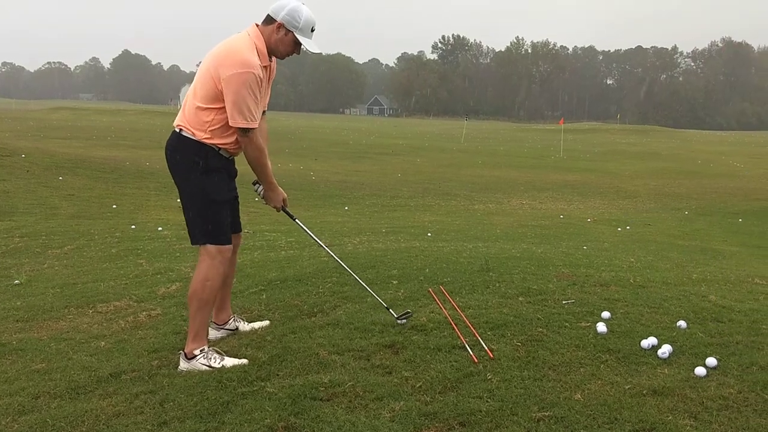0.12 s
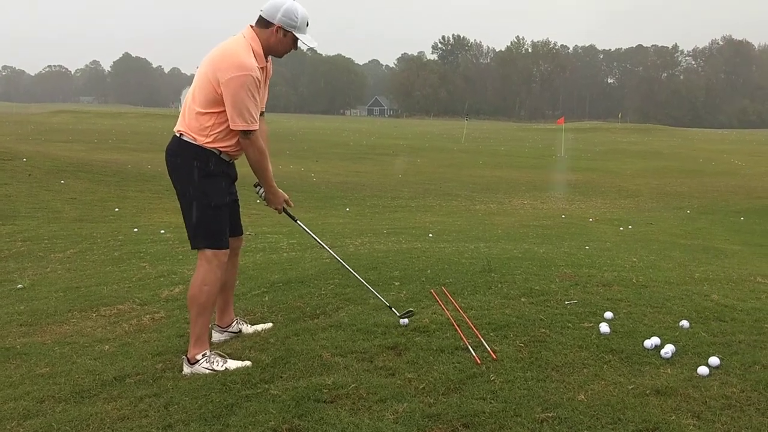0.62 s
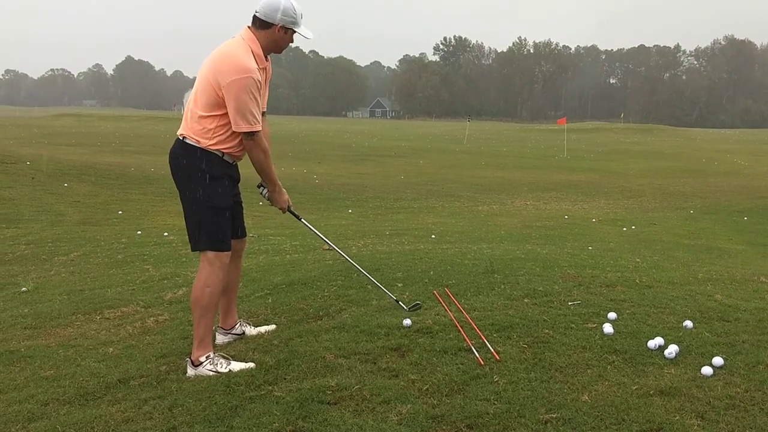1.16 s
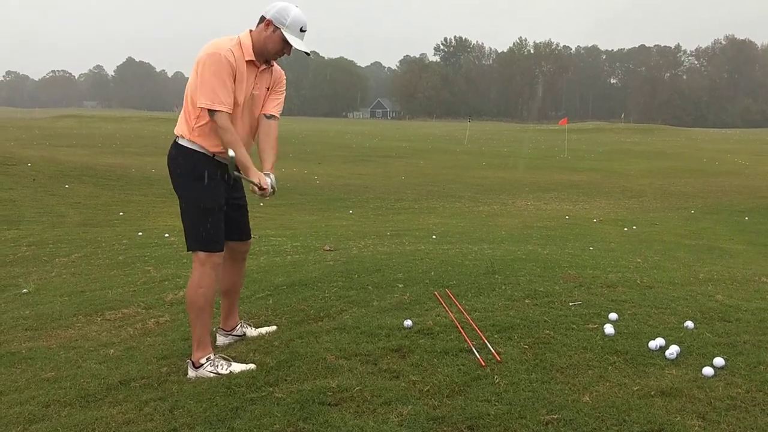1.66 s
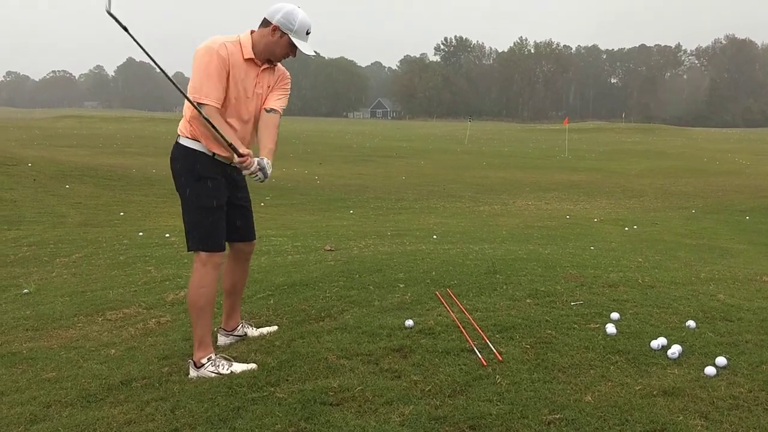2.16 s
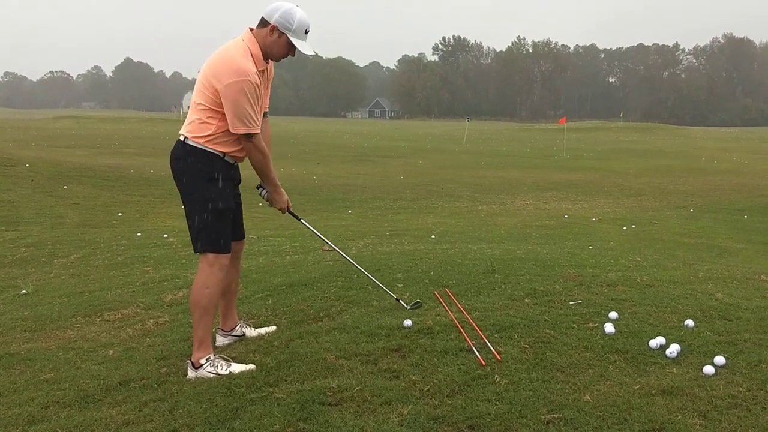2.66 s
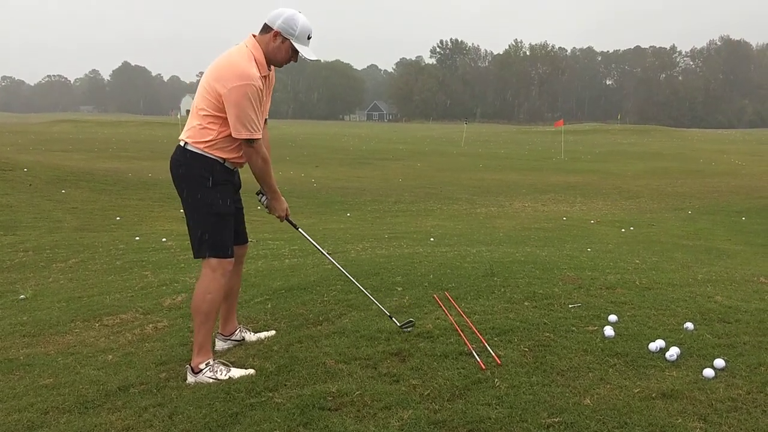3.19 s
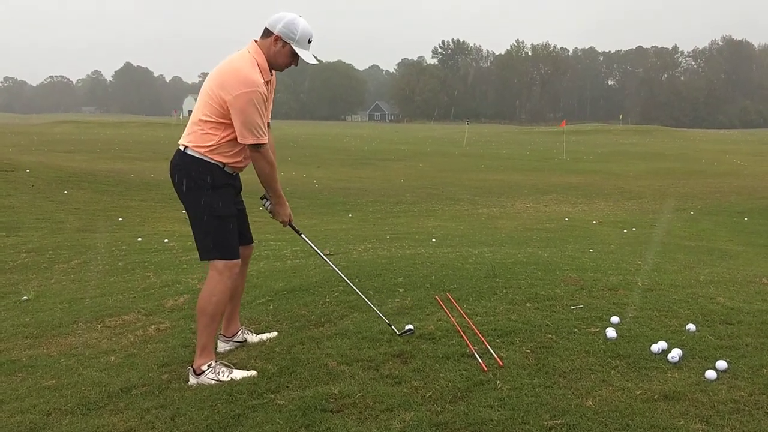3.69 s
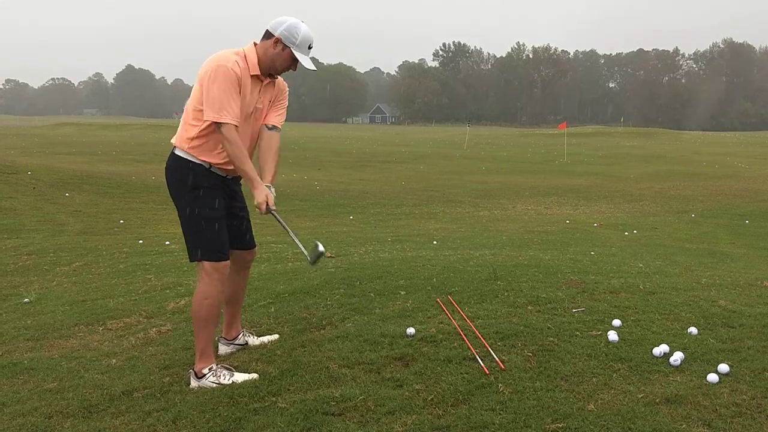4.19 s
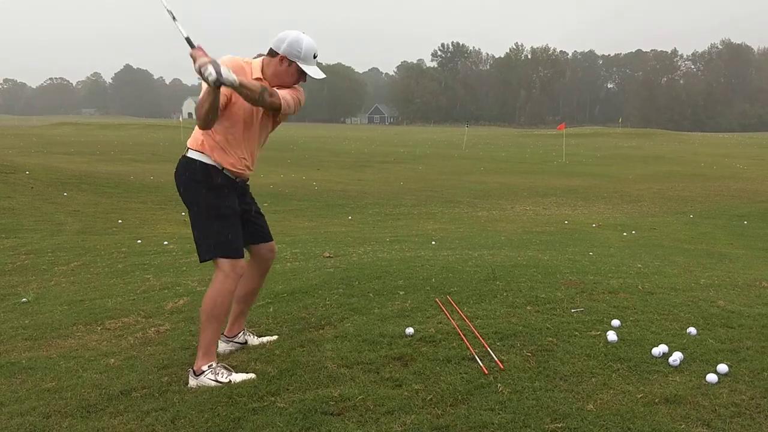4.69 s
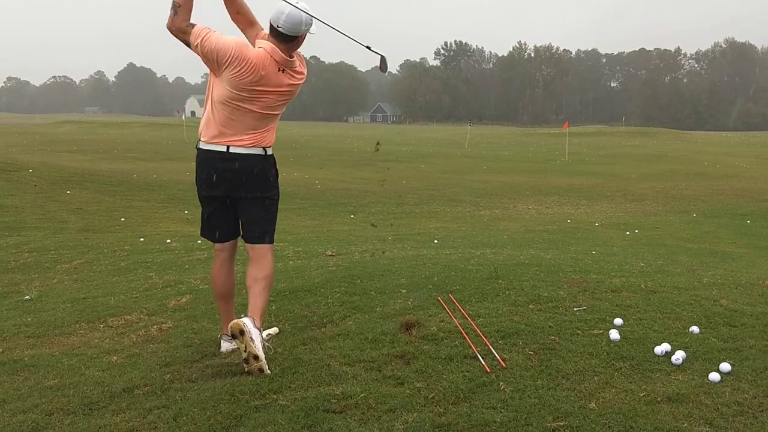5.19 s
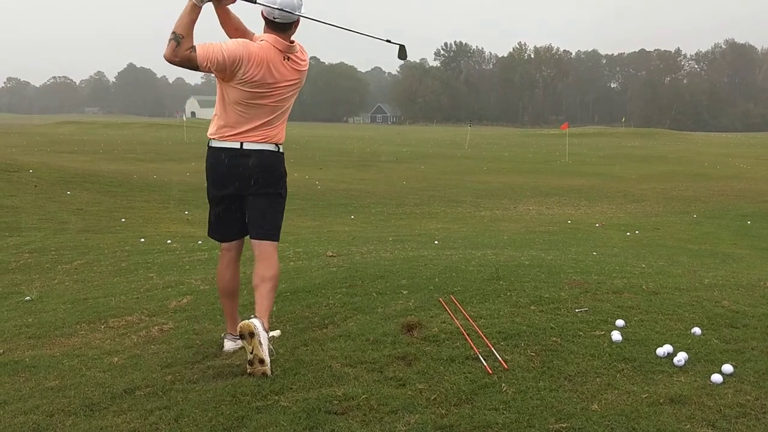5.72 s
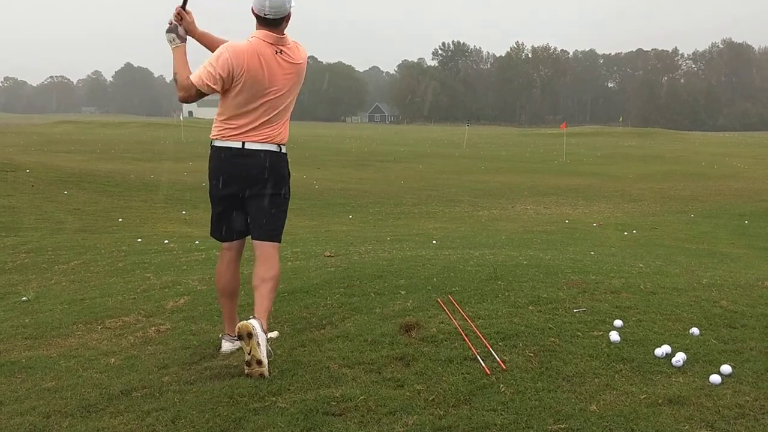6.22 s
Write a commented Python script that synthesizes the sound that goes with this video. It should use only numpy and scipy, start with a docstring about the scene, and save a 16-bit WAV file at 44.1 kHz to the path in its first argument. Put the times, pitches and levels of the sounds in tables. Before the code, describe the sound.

Steady rain hisses and ticks close to the microphone until a golf iron whooshes and cracks a ball; everything then drops suddenly quieter.

```python
"""Steady rain on open grass, on a handheld camera with two microphone ports: far rain hisses, drops tick on the casing
nearer one port or the other, water sputters in a port, wind buffets both ports and a far motor hums throughout.
Late on, a golf iron swings down with a rough whistle and a rush of air, then thuds and skids into the turf;
4 ms later its face cracks the ball and throws soil. The camera's gain control ducks deeply and creeps back."""
import sys
import numpy as np
from scipy import signal
from scipy.fft import rfft, irfft, next_fast_len
from scipy.io import wavfile
from scipy.ndimage import uniform_filter1d, map_coordinates

SR = 44100
rng = np.random.default_rng(int(sys.argv[2]) if len(sys.argv) > 2 else 0)


def to_wav(s):
    """Save 16-bit WAV."""
    ch = np.atleast_2d(s).T  # columns
    pcm = np.round(np.clip(ch, -1, 1) * 32767)  # PCM
    wavfile.write(sys.argv[1], SR, pcm.astype(np.int16))


def makeup_ratio(level_db):
    """Linear amplitude ratio for a level in decibels (20 dB per factor of ten)."""
    decades = np.asarray(level_db, float) / 20
    return 10 ** decades


N = 280035

TURF_S, BALL_S = 4.8829, 4.8870
# relative colour of the club head's rush and of the thrown soil: (frequency [Hz], level [dB])
RUSH_COLOUR = [(300, -2), (600, 2), (1200, 3), (3000, 6.5), (5500, -3.5), (7500, -12.5), (10000, -6),
               (15000, -15.5)]


def unit(x):
    """x at rms 1."""
    return x / np.sqrt(np.mean(x ** 2) + 1e-20)


def along(points, hz):
    """Columns of (Hz, value, ..) rows read on a log frequency axis."""
    f, *cols = np.transpose(points)
    return np.array([np.interp(np.log(hz + 1), np.log(f + 1), c) for c in cols])


def curves(rows):
    """One value per sample for each column after the time."""
    s, *cols = np.transpose(rows)
    return [np.interp(np.arange(N) / SR, s, c) for c in cols]


def wobble(rate):
    """A smooth random curve, rate knots a second."""
    knots = rng.standard_normal(int(N * rate / SR) + 4)
    return map_coordinates(knots, [np.arange(N) * rate / SR])


def filtered(x, response):
    """x times a response of frequency."""
    m = next_fast_len(N + 8192)
    return irfft(rfft(x, m) * response(np.fft.rfftfreq(m, 1 / SR)), m)[..., :N]


def ports(pan_db):
    """Gains of the first and second port; the nearer one hears the full level."""
    return makeup_ratio([np.minimum(pan_db, 0), np.minimum(-pan_db, 0)])


def strike(turf_db=-19, ball_db=-2, thud_db=-20, spray_db=-12):
    """The sole thuds and skids through grass, then the face cracks the ball, rings briefly and throws soil."""
    # ringing modes of club face and ball: (frequency [Hz], level [dB], t60 [s])
    face_modes = [(300, -20, 0.044), (890, -15.5, 0.0015), (1700, -11, 0.0022), (2300, -10, .002),
                  (3156, .4, 0.005), (5331, -11, 0.0039), (7130, -9.5, 0.0017), (9214, -7.5, 0.0025),
                  (12001, -14, 0.0016)]
    t = np.arange(N) / SR
    since_ball = np.clip(t - BALL_S, 0, 1)
    since_thud = np.clip(t - TURF_S + .003, 0, 1)
    thud = makeup_ratio(thud_db - 60 * since_thud / 0.099) * np.sin(2 * np.pi * 250 * since_thud)

    grit = rng.standard_normal((2, 2, N))
    # the skid holds its level from the turf to the ball, then dies away
    skid_gain = makeup_ratio(turf_db) * (t > TURF_S) * makeup_ratio(-60 * since_ball / 0.0061)
    skid = skid_gain * unit(signal.lfilter([1], [1, -.45], grit[0]))

    soil = unit(filtered(grit[1], lambda hz: makeup_ratio(along(RUSH_COLOUR, hz))))
    spray = makeup_ratio(spray_db - 60 * since_ball / .036) * (1 - np.exp(-since_ball / 0.00075)) * soil

    ring = sum(makeup_ratio(db - 60 * since_ball / t60) * np.sin(2 * np.pi * hz * since_ball)
               for hz, db, t60 in face_modes)
    return thud + (skid + spray + makeup_ratio(ball_db) * ring) * ports(-7)[:, None]


def swing():
    """Vortices off the shaft whistle roughly; the head rushes broadly, up to the turf."""
    # downswing: (time [s], shaft whistle level [dB], whistle frequency [Hz], head rush level [dB],
    # lift of the rush above 6.5 kHz [dB])
    downswing = [(4.775, -58.5, 522, -49.5, -6), (4.805, -58, 560, -49, -6), (4.822, -44, 620, -41, -10),
                 (4.834, -39, 560, -34, -9), (4.845, -35, 620, -34, 1), (4.858, -35, 610, -33, 1),
                 (4.865, -41, 760, -32, 0), (4.872, -37, 900, -32, 0), (4.880, -38, 700, -31, 0)]
    whistle_db, hz, rush_db, treble_db = curves(downswing)
    t = np.arange(N) / SR
    gate = np.clip((t - 4.76) / 0.04, 0, 1) * np.clip((TURF_S + .003 - t) / .003, 0, 1)
    phase = 2 * np.pi * np.cumsum(hz) / SR
    # fast random modulation roughens the tone
    whistle = unit((1.1 + wobble(330)) * np.sin(phase) + wobble(250) * np.cos(phase))
    rush = unit(filtered(rng.standard_normal((2, N)), lambda f: makeup_ratio(along(RUSH_COLOUR, f))))
    treble = signal.lfilter(*signal.butter(1, 6500, "high", fs=SR), rush)
    return gate * (makeup_ratio(whistle_db) * whistle + makeup_ratio(rush_db) * (rush + (makeup_ratio(treble_db) - 1) * treble))


def ticks(rows, cycles=3.17, longer=.46, sag=0.21, rise=2.6, splash_t60=0.0014):
    """Each drop dents the casing: a brief click that sags in pitch, the shell's knock and a noisy splash."""
    # modes of the shell that every drop knocks: (frequency [Hz], level [dB], t60 [s])
    shell_modes = [(880, 0, .0067), (1500, -8, .004), (2900, -6, .004), (5500, -9, .004), (8300, -17, .003)]
    # colour of a splash, lifted by the port's cavity: (frequency [Hz], level [dB])
    splash_colour = [(500, -12), (2000, -5), (5500, -2), (8000, -10), (10500, -4), (13500, 8.5), (16000, 4)]
    # stiff spot, where high drops ring longer: begins at [Hz], full at [Hz], added t60 [s]
    stiff_spot = (3000, 5000, .0022)
    # a drop that splashes less puts its push into the shell:
    # knock [dB] at a -15 dB splash, dB of knock per dB of splash
    knock_at_15_db, knock_trade = -14.5, 1.3
    soft_db = 6  # per octave, lost by shell modes above a soft drop's own ring

    out, t = np.zeros((2, N + 512)), np.arange(512) / SR
    shell_hz, shell_db, shell_t60 = np.transpose(shell_modes)
    modes = np.sin(2 * np.pi * np.outer(shell_hz, t)) * makeup_ratio(-60 * t / shell_t60[:, None])
    modes = modes * (1 - np.exp(-t / 0.00036))
    colour = makeup_ratio(along(splash_colour, np.fft.rfftfreq(512, 1 / SR))[0])
    sprays = irfft(rfft(rng.standard_normal((len(rows), 2, 512))) * colour) * (1 - np.exp(-t / 0.00062))
    fade = np.clip((512 - np.arange(512)) / 128, 0, 1)

    for (s, db, pan_db, hz, splash_db), spray in zip(rows, sprays):
        softness_db = soft_db * np.log2(np.maximum(shell_hz / hz, 1))
        knock_db = knock_at_15_db - knock_trade * (splash_db + 15) + shell_db - softness_db
        short = cycles * (hz / 1000) ** longer / hz  # t60 away from the stiff spot
        t60 = short + np.interp(hz, stiff_spot[:2], [0, stiff_spot[2]])
        bend = 1 + sag * short / t60 * (1 - 2 * t / (t + t60 / 4))
        phase = 2 * np.pi * hz * np.cumsum(bend) / SR
        ring = -np.sin(phase) * makeup_ratio(-60 * t / t60) * (1 - np.exp(-rise * t * hz))
        click = np.sqrt(short / t60) * ring / np.abs(ring).max()
        splash = spray * makeup_ratio(splash_db - 60 * t / splash_t60)
        tick = fade * (click + makeup_ratio(knock_db) @ modes) + splash
        out[:, round(s * SR):][:, :512] += makeup_ratio(db) * ports(pan_db)[:, None] * tick
    return out[:, :N]


def drops(faint_db=-44, spread_db=1.3, centre_hz=3300):
    """The loud drops on the casing at set times, and many faint ones by chance."""
    # loud drops: (time [s], level [dB], first minus second port [dB], ring [Hz], splash against the tick [dB])
    loud_drops = [(0.0319, -29, -8, 4754, -12), (0.0335, -35, 10, 1800, -12),
                  (0.0692, -26, -10, 4750, -25.5), (0.1542, -29, -9, 5300, -8),
                  (0.1739, -28, 11.5, 1920, 3), (0.1858, -37, 10, 1200, -15),
                  (0.1923, -19, -33, 2500, -14.5), (0.1921, -22, -33, 5200, -10),
                  (0.2709, -14.5, 25.5, 2680, -13.5), (0.4353, -36.5, 11.5, 1960, -11.5),
                  (0.6078, -10.5, -23.5, 4700, -14.5), (0.6079, -27, -15, 1700, -10),
                  (0.6946, -38.5, 5, 10600, 2), (0.7836, -38, 7.5, 1300, -14.5),
                  (0.8999, -29.5, 14.5, 1440, -22), (0.9241, -34, 7.5, 3000, -1.5),
                  (0.9359, -31.5, -19, 1340, -24.5), (1.0124, -27.5, -29, 1140, -5.5),
                  (1.0384, -27, -6.5, 12980, 3.5), (1.066, -36, 10.5, 300, -15.5),
                  (1.0964, -23, -11, 4860, -15.5), (1.1375, -32.5, -14.5, 5360, -6),
                  (1.1558, -21, -10, 4570, -19.5), (1.1813, -28.5, -19.5, 1960, -13.5),
                  (1.5609, -35, 26.5, 1950, 19), (2.1637, -35.5, -15, 6600, -4),
                  (2.1985, -7, 10.5, 2680, -8), (2.2739, -24, -8, 5560, -22.5),
                  (2.3383, -16, 22, 2140, -15.5), (2.3766, -20, -12, 4400, -15),
                  (2.3922, -25, -17, 4140, -14), (2.4829, -28.5, -15, 3290, -11.5),
                  (2.5001, -30.5, -9.5, 2910, 4.5), (2.5297, -26, -8.5, 13700, 3),
                  (2.6232, -13.5, -25, 1700, -29), (2.6371, -27, -12, 3620, -4),
                  (2.678, -29, -17.5, 6150, -11), (2.7366, -29, -12.5, 2600, -9),
                  (2.9944, -32, -16, 5460, -14), (3.0502, -28.5, -16, 3980, 9),
                  (3.0555, -32, -12, 5400, -15), (3.3278, -36, -12, 5300, -10),
                  (3.4345, -34, -12, 5900, -12), (3.445, -33, 8, 12000, -5), (3.4715, -33, -12, 5200, -15),
                  (3.9833, -31, -12, 5600, -5), (1.5968, -34, -8, 5400, 0), (1.8205, -34, 10, 2200, -10),
                  (0.558, -38, 10, 1200, -10), (0.967, -34, -10, 1700, -12), (3.143, -33.5, -7, 2630, -7.5),
                  (3.4602, -26, 21, 4430, 11), (3.4725, -26, -11.5, 1030, -21),
                  (3.6111, -23.5, 19.5, 2340, -15), (3.6135, -29.5, 16.5, 300, -17),
                  (3.6566, -16, 27.5, 1700, -25), (3.6694, -33.5, 11.5, 1900, -15),
                  (3.7321, -16.5, -6.5, 5500, 20), (3.9081, -23.5, -13.5, 4140, 6.5),
                  (4.2036, -29, 12.5, 2300, -12), (4.2121, -9, 18, 350, -24.5),
                  (4.2893, -30.5, -10.5, 5070, -22), (4.5093, -23, -8.6, 5400, -22),
                  (4.5544, -25, -11.5, 5340, -20.5), (4.5905, -28.5, -19, 5700, 7),
                  (4.6193, -32, 16.5, 1550, -25), (4.7273, -25.5, 22, 2100, -18),
                  (4.7835, -31.5, -9, 5340, -17.5), (4.81, -26, -12, 3400, -18),
                  (4.9161, -23.5, 18, 350, -20.5), (4.9388, -30, -13.5, 5000, -24),
                  (5.0454, -26, -14, 5320, -17), (5.2586, -27, 15, 2170, 9.5), (5.4382, -29, -6.5, 1500, 2),
                  (5.5067, -29.5, 11.5, 350, -17), (5.6252, -19, -15, 2077, 9.5),
                  (5.8112, -24, 12, 14300, -1.5), (5.48, -30, -8, 14300, -5), (6.0105, -33, -12, 5500, -15),
                  (6.142, -27, -8, 14000, -3), (6.32, -35, -10, 8000, -10), (6.0026, -26, 15, 1680, -18),
                  (0.7764, -37, -12, 6120, -15), (0.8418, -37, -12, 5600, -15),
                  (0.9381, -33, -12, 5600, -15), (0.9446, -37, -12, 5430, -15),
                  (1.0128, -34, -12, 5600, -15), (1.188, -36, 12, 1500, -15), (1.2165, -35, -12, 7800, -15),
                  (1.2972, -36, 12, 1030, -15), (1.4798, -39, 12, 990, -15), (1.5068, -37, -12, 5340, -15),
                  (1.6644, -34, 12, 3360, -15), (1.7971, -35, -12, 5730, -15), (2.0909, -35, 12, 2890, -15),
                  (2.505, -36, 12, 1160, -15), (2.7055, -34, -12, 3700, -15), (2.8148, -31, 12, 2670, -15),
                  (2.9605, -38, 12, 1200, -15), (3.0383, -34, 12, 3270, -15), (3.1635, -37, 12, 1590, -15),
                  (3.179, -35, -12, 3900, -10), (3.2708, -38, -12, 1250, -15), (3.329, -35, -12, 1290, -15),
                  (3.4274, -34, -12, 14690, -15), (3.8519, -35, -12, 1460, -15),
                  (3.9033, -32, 12, 1420, -15), (3.9298, -34, -12, 14210, -15),
                  (4.0395, -38, -12, 5510, -15), (4.2171, -34, -12, 5600, -15),
                  (4.3423, -37, -12, 9500, -15), (4.4132, -37, -12, 5430, -15),
                  (4.4446, -39, 12, 1300, -15), (4.4586, -36, -12, 5340, -15),
                  (4.5783, -35, -12, 5770, -15), (4.6741, -37, -12, 5510, -10),
                  (5.0372, -37, -12, 5250, -15), (5.104, -38, 5, 5500, 0), (5.4488, -36, 12, 1800, -15),
                  (5.6035, -36, 12, 1300, -10), (5.6249, -23, -12, 5700, -15), (5.657, -36, -12, 3100, -15),
                  (5.8324, -38, 12, 1380, -15), (5.9113, -38, -12, 5500, -15),
                  (6.0405, -37, -12, 3200, -15)]
    u = rng.random((420, 5))
    db = faint_db - spread_db * np.log(u[:, 1] + 0.044)
    hz = centre_hz * np.exp(2.2 * (u[:, 3] - .5))
    faint = np.c_[u[:, 0] * N / SR, db, 30 * (u[:, 2] - .5), hz, -4 - 16 * u[:, 4]]
    return ticks(loud_drops) + ticks(faint)


def fizz():
    """Water nearer the second port sputters: runs of tiny splashes as short bursts of narrow noise."""
    # sputters: (middle [s], time to fade 20 dB either side [s], level [dB], frequency [Hz], width [Hz])
    sputters = [(.0335, .004, -42, 5500, 1200), (.1555, .005, -43, 5600, 1200),
                (.926, .005, -42, 2000, 1500), (2.165, .005, -39, 3000, 2000),
                (3.9095, .007, -37, 4500, 4000), (5.918, .015, -47, 14300, 500),
                (5.938, .01, -46, 14300, 500), (5.955, .013, -39, 14500, 300),
                (5.983, .025, -46, 14400, 400)]
    out, t = np.zeros(N + 4096), (np.arange(4096) - 2048) / SR
    f = np.fft.rfftfreq(4096, 1 / SR)
    for (s, fade, db, hz, width), noise in zip(sputters, rng.standard_normal((len(sputters), 4096))):
        narrow = unit(irfft(rfft(noise) / (1 + ((f - hz) / width) ** 2)))
        out[round(s * SR):][:4096] += makeup_ratio(db - 20 * np.abs(t) / fade) * narrow
    return out[2048:N + 2048] * ports(-8)[:, None]


def rain(level_db=-48.5, patchy_db=2.0, patter=0.25, spread_db=5):
    """Far drops merge into patchy hiss; nearer ones on the grass stay a fine patter of clicks."""
    # relative colour of the far rain: (frequency [Hz], first port [dB], second port [dB])
    rain_colour = [(350, 5.5, 6.0), (700, 1.2, 1.8), (1200, -.8, .8), (1800, 0.3, 2.8), (2700, 0.1, 4.5),
                   (3800, -2.9, 2.3), (5000, -5.8, -2.4), (6200, -8.5, -6.6), (8200, -11.1, -7.6),
                   (10500, -9.7, -6.6), (12700, -5.9, -1.6), (15000, -3.8, 0.6)]
    # likeness of the rain at the two ports: (frequency [Hz], coherence [0-1])
    likeness = [(250, 0.8), (600, 0.2), (1200, 0), (2500, .05)]
    z = signal.stft(rng.standard_normal((2, N)), nperseg=256)[2]
    # one field of patches, smooth in frequency and time, for both noises
    field = uniform_filter1d(uniform_filter1d(rng.standard_normal(z.shape[1:]), 5, 0), 12, 1)
    hiss = signal.istft(z * makeup_ratio(patchy_db * unit(field)), nperseg=256)[1][:, :N]

    draw = rng.random((3, 2, N))
    falls = draw[0] < 400 / SR  # about 400 clicks a second
    clicks = falls * np.sign(draw[1] - .5) * makeup_ratio(-spread_db * np.log(draw[2] + 1e-3))
    a, b = unit(hiss) + patter * unit(clicks)

    # sum and difference of two unrelated sources set the coherence of the ports
    turn = lambda hz: np.arccos(np.clip(along(likeness, hz)[0], 0, 1)) / 2
    shared = filtered(a, lambda hz: np.cos(turn(hz)))
    own = filtered(b, lambda hz: np.sin(turn(hz)))
    low_cut = lambda hz: hz ** 2 / (hz ** 2 + 90 ** 2)
    pair = filtered(np.array([shared + own, shared - own]),
                    lambda hz: makeup_ratio(along(rain_colour, hz)) * low_cut(hz))
    return makeup_ratio(level_db + 0.74 * wobble(1.7)) * unit(pair)


def puffs(breeze_db=-59, wander_db=3):
    """Wind level in dB: a wandering breeze under short puffs."""
    # puffs of wind on the ports: (time [s], peak level [dB], time to fade 20 dB either side [s])
    wind_puffs = [(0.079, -50, 0.23), (1.11, -49.5, .2), (1.45, -47.5, 0.0846), (1.615, -35, 0.0967),
                  (1.95, -48, 0.17), (2.465, -42, .05), (2.497, -36, 0.06), (2.545, -45, .04),
                  (2.685, -43, .07), (2.725, -44, .07), (2.825, -45, .04), (2.885, -44, .05),
                  (2.982, -36, .025), (3.04, -35, 0.09), (3.14, -43, .08), (3.315, -41, 0.05),
                  (3.41, -41, .05), (3.458, -38, 0.06), (3.6, -45, 0.1), (3.72, -45, 0.04),
                  (3.98, -43.5, 0.13), (4.22, -43.5, 0.07), (4.36, -45.5, 0.0361), (4.65, -49, .1),
                  (5.05, -48, 0.25), (5.46, -44, 0.14), (6.22, -46.5, 0.07)]
    t = np.arange(N) / SR
    peaks = sum(makeup_ratio(db - 20 * np.abs(t - s) / fade) for s, db, fade in wind_puffs)
    return 20 * np.log10(peaks + makeup_ratio(breeze_db + wander_db * wobble(13)))


def wind(gust_db=-40, alike=0.28):
    """Lumpy low buffeting, mostly unrelated from port to port; stronger puffs reach higher."""
    # relative colour of the buffeting: (frequency [Hz], calm [dB], gust [dB])
    buffet_colour = [(15, -36.5, -44.5), (30, -15, -25.5), (45, -7, -14.5), (67, 5, -4.5),
                     (92.5, -1.5, 2.5), (143.7, -11.5, -0.5), (205.4, -21, -10.5), (303, -33.5, -25.5),
                     (500, -51, -48)]
    level_db = puffs()
    noise = rng.standard_normal((2, 3, N))
    noise = noise[:, :2] + alike * noise[:, 2:]  # the third noise reaches both ports
    calm, gust = filtered(noise, lambda hz: makeup_ratio(along(buffet_colour, hz))[:, None])
    # even out the noises' own swells before adding the lumps
    calm, gust = (v / np.sqrt(abs(uniform_filter1d(unit(v) ** 2, 1500)) + .3) for v in (calm, gust))
    lumps = makeup_ratio(1.5 * wobble(26) + 1.1 * np.array([wobble(9), wobble(9)]))
    brighter = np.clip(makeup_ratio(0.39 * (level_db - gust_db)), 0, 1.5)
    buffeting = unit(calm) + brighter * unit(gust)
    return makeup_ratio(level_db) * unit(lumps) * buffeting * ports(3)[:, None]


def hum(hz=116.1, rumble_db=-54):
    """The far motor: a slightly unsteady tone with a weak octave on a dull rumble, alike at both ports."""
    # motor: (time [s], tone level [dB], octave against the tone [dB])
    motor = [(0.0, -49.5, -19), (0.8, -50, -19), (1.4, -46.5, -20), (1.6, -53, -18), (2.5, -57, -16),
             (3.2, -57, -16), (3.5, -55, -16), (4.4, -57, -16), (5.5, -58, -14), (5.95, -49.5, -12),
             (6.35, -48.5, -12)]
    # relative colour of the rumble around the tone: (frequency [Hz], level [dB])
    rumble_colour = [(30, -40), (60, -10), (90, 2), (170, 1), (260, -5), (400, -34)]
    phase = 2 * np.pi * np.cumsum(hz + 2.5 * wobble(8)) / SR
    flutter_db = 1.8 * wobble(9)
    tone_db, octave_db = curves(motor)
    both = np.sin(phase) + makeup_ratio(octave_db) * np.sin(2 * phase)
    tone = makeup_ratio(tone_db + flutter_db) * np.sqrt(2) * both
    rumble = unit(filtered(rng.standard_normal(N), lambda f: makeup_ratio(along(rumble_colour, f)[0])))
    return tone + makeup_ratio(rumble_db) * rumble


def scene():
    """Pressure at the two ports."""
    return strike() + swing() + drops() + fizz() + rain() + wind() + hum()


def widened(pair):
    """The camera widens its stereo: each side loses a late copy of the other port, which combs the sum."""
    # depth of the comb notches as heard, nearly silent at the notch in some bands: (frequency [Hz], share of
    # the other port subtracted # [0-1], extra lag [radians])
    crosstalk = [(100, .86, 0), (2200, .93, .14), (4400, .8, .13), (6600, .92, .06), (8800, .9, .03),
                 (11000, .76, .02), (13200, .62, .1), (15400, .55, 0)]
    lag_s = 20 / SR

    def late(hz):
        share, extra_lag = along(crosstalk, hz)
        return np.clip(share, 0, 1) * np.exp(-1j * (2 * np.pi * hz * lag_s + extra_lag))

    return pair - filtered(pair[::-1], late)


def gain_control(x, knee_db=-13.0, slope=3.23, deepest_db=28, release_db=13, attack=0.0027):
    """Gain falls just after a sharp loud moment, more the louder it is up to a stop, and climbs at a steady dB/s."""
    sharp = signal.lfilter(*signal.butter(2, 900, "high", fs=SR), x)
    power = signal.lfilter(np.ones(28) / 28, 1, np.max(sharp ** 2, 0))  # louder side, mean of 28 samples
    level = 10 * np.log10(power + 1e-12)
    climb = release_db * np.arange(N) / SR
    wanted = np.minimum(slope * (level - knee_db), deepest_db)
    cut = np.maximum(np.maximum.accumulate(wanted + climb) - climb, 0)
    keep = np.exp(-1 / (max(attack, 1e-4) * SR))
    lagging = signal.lfilter([(1 - keep) ** 2], [1, -2 * keep, keep ** 2], cut)
    return x * makeup_ratio(-lagging)


def low_pass(x):
    """Removes everything above the highest recorded frequency."""
    return signal.sosfilt(signal.butter(12, 16580, fs=SR, output="sos"), x)


def record(dry):
    """The camera widens the ports' stereo, rides the gain, clips and trims both ends of the spectrum."""
    top_hz = 15770
    held = np.clip(gain_control(widened(dry)), -.97, .97)
    held = filtered(held, lambda hz: 1 / (1 + (hz / top_hz) ** 500))
    held = signal.lfilter(*signal.butter(2, 28, "high", fs=SR), held)
    return low_pass(held)


dry = scene()
out = record(dry)
to_wav(out)
```